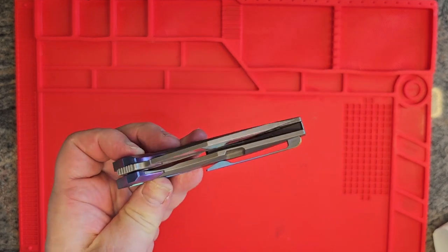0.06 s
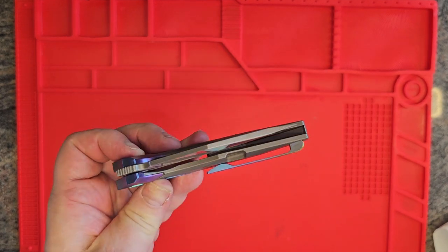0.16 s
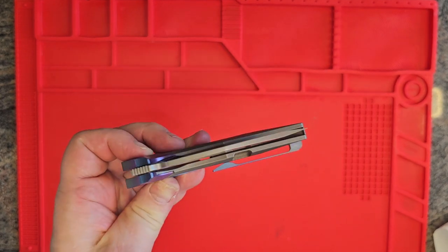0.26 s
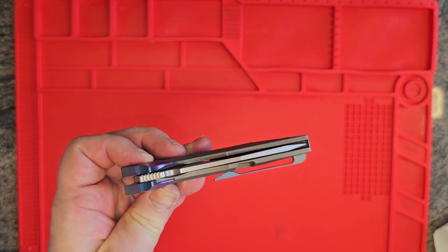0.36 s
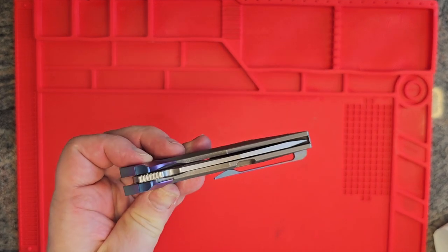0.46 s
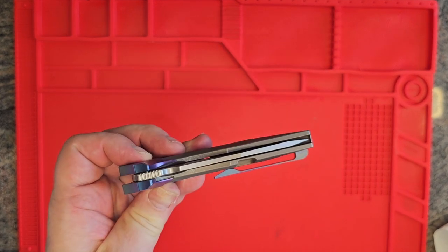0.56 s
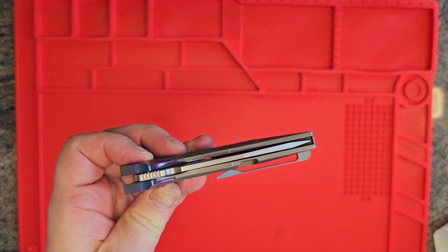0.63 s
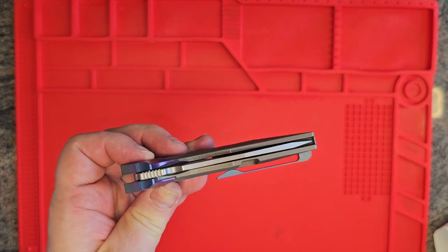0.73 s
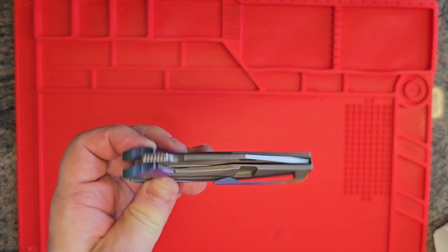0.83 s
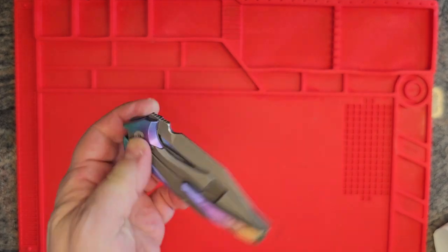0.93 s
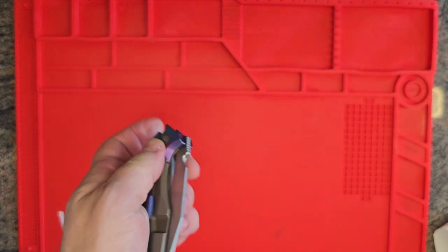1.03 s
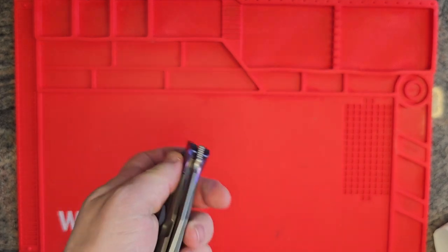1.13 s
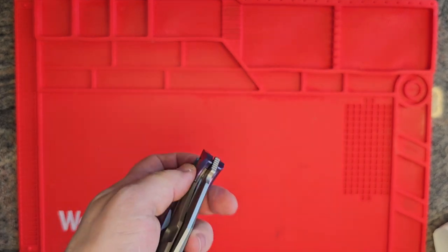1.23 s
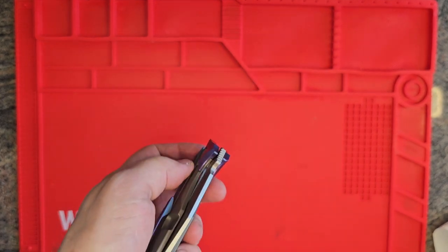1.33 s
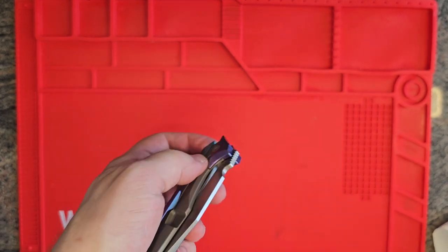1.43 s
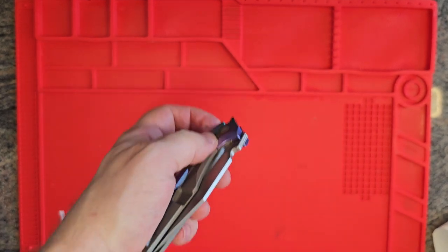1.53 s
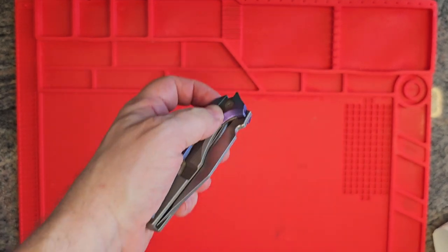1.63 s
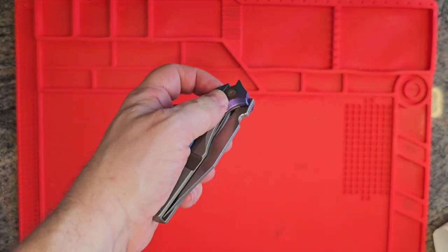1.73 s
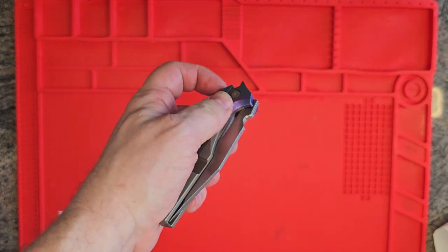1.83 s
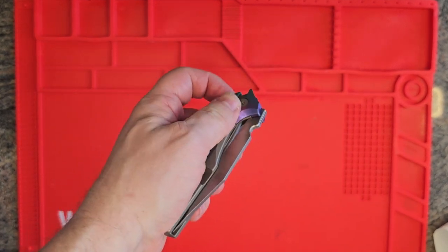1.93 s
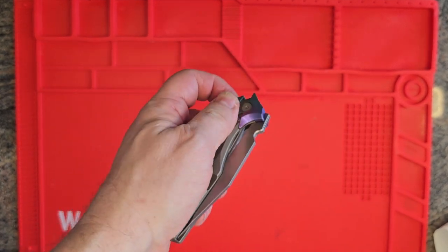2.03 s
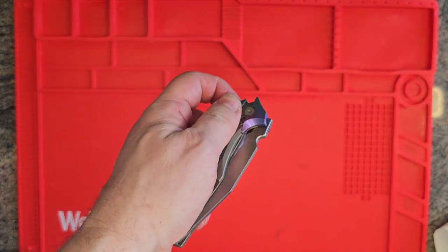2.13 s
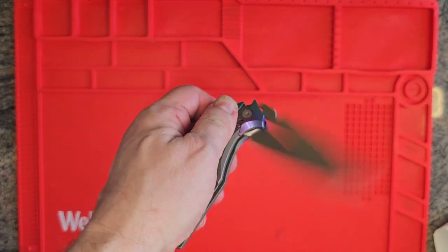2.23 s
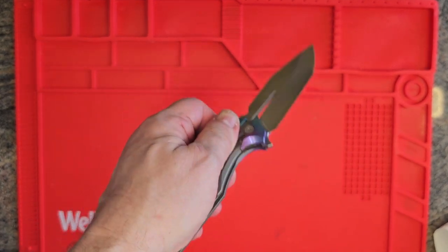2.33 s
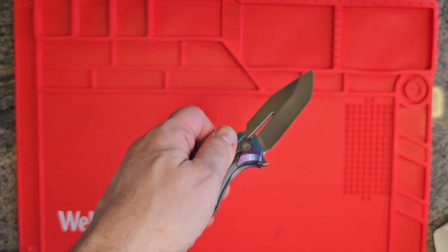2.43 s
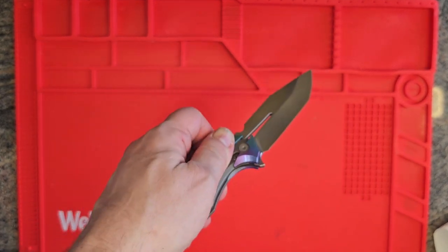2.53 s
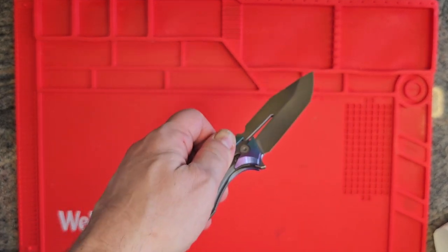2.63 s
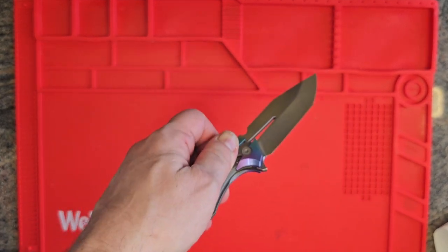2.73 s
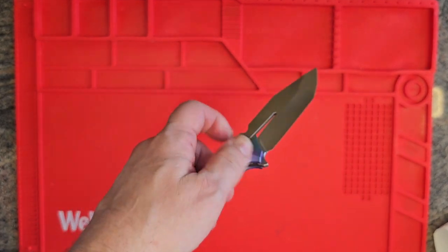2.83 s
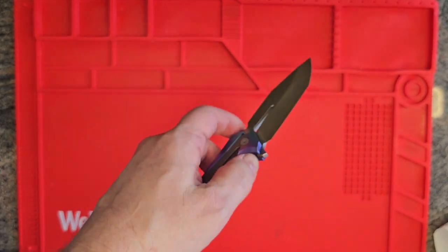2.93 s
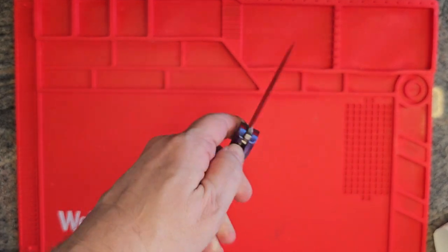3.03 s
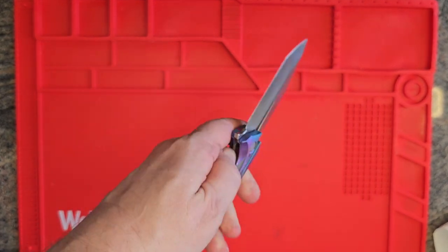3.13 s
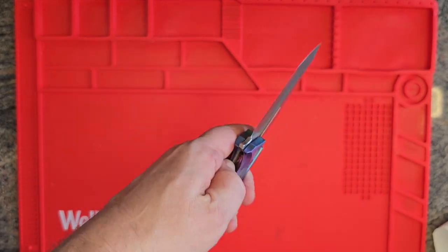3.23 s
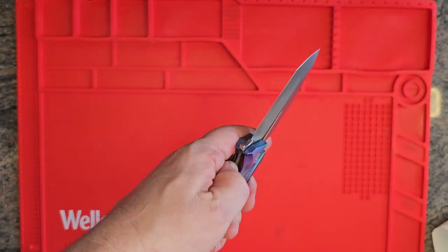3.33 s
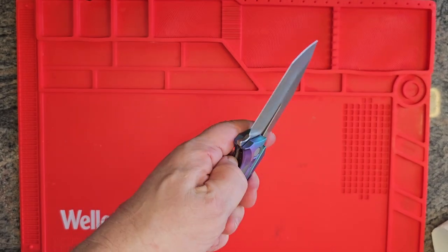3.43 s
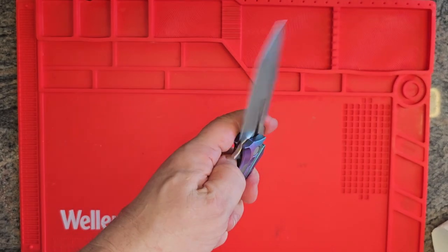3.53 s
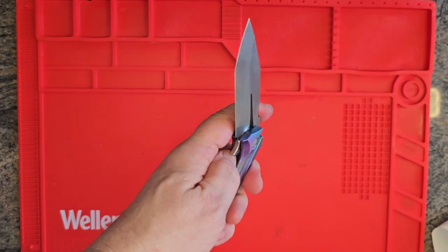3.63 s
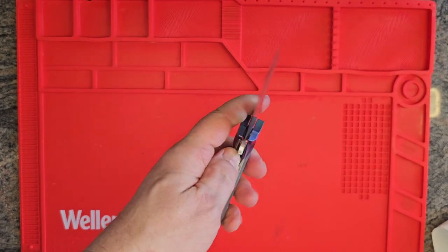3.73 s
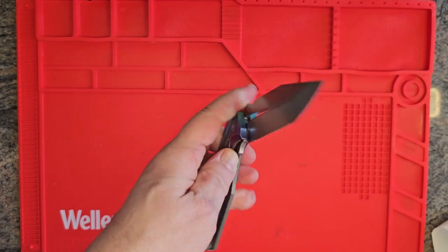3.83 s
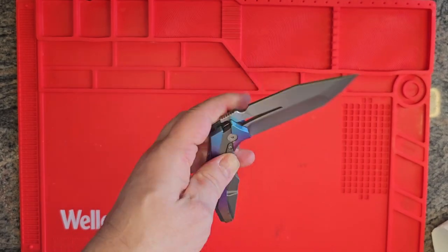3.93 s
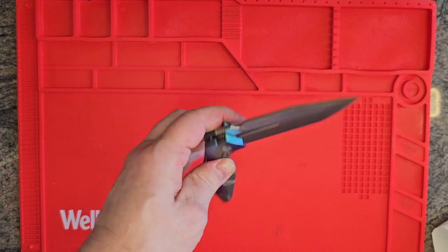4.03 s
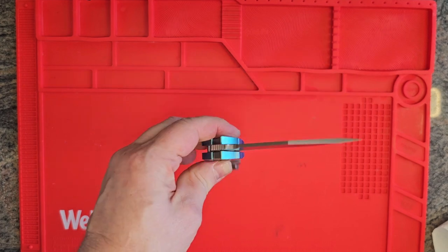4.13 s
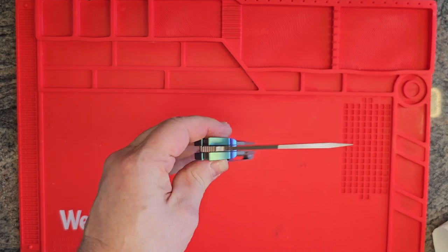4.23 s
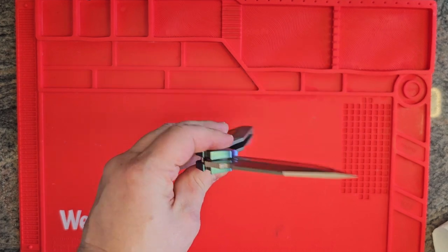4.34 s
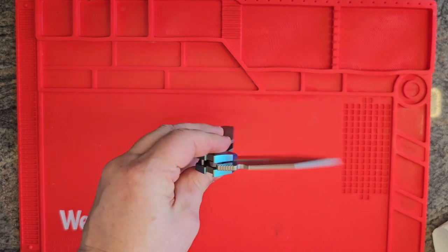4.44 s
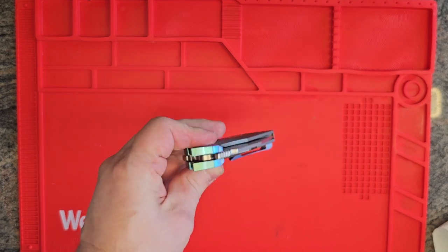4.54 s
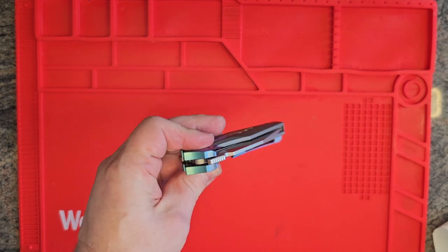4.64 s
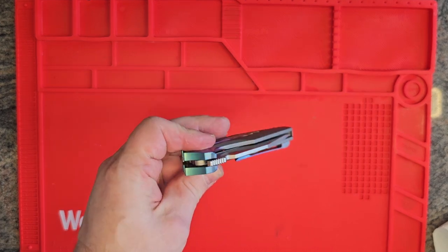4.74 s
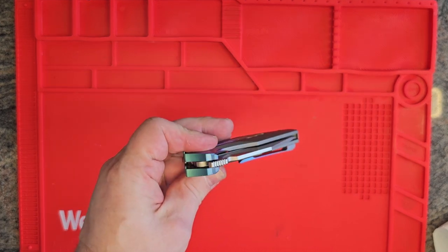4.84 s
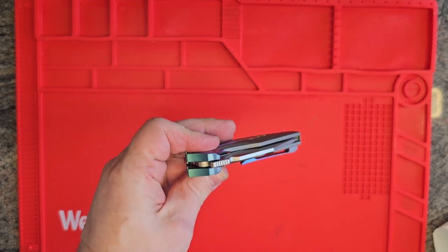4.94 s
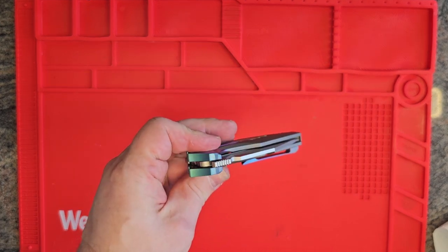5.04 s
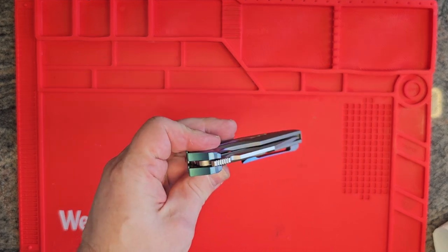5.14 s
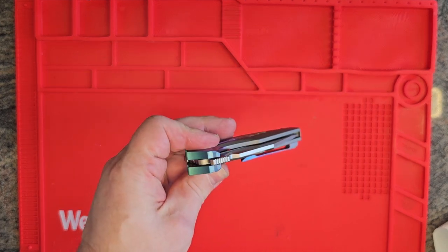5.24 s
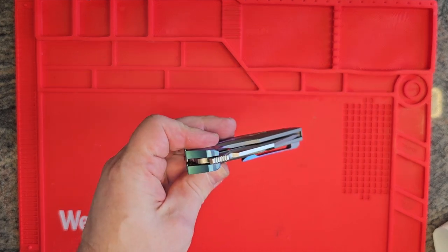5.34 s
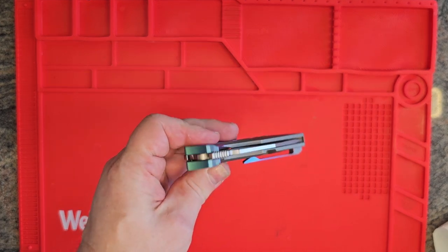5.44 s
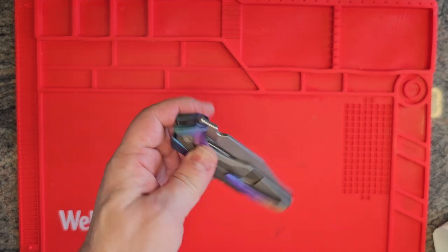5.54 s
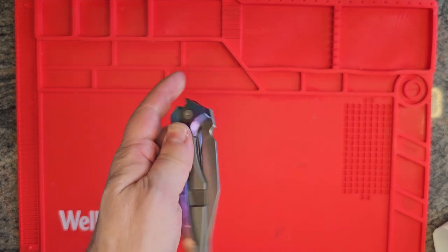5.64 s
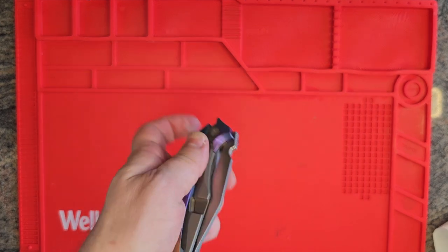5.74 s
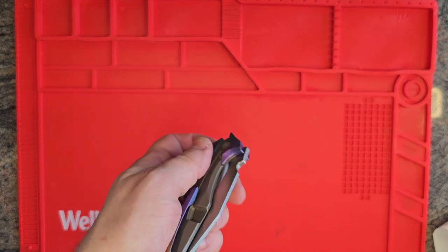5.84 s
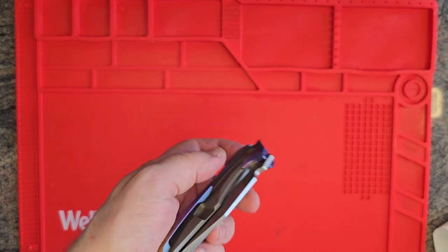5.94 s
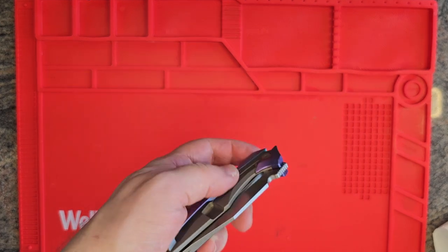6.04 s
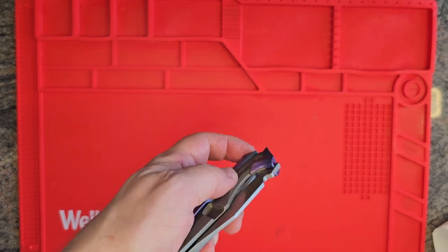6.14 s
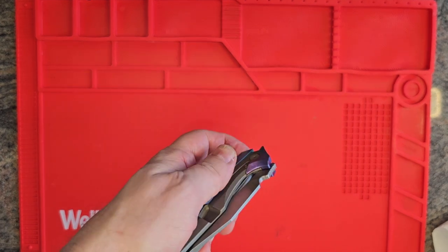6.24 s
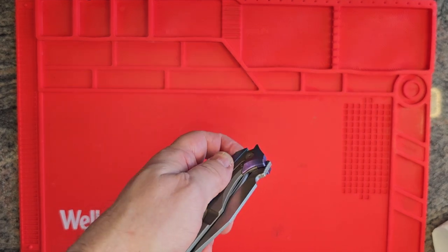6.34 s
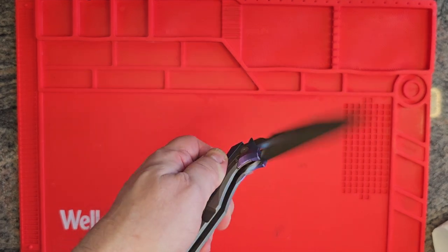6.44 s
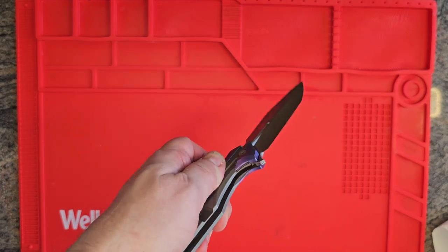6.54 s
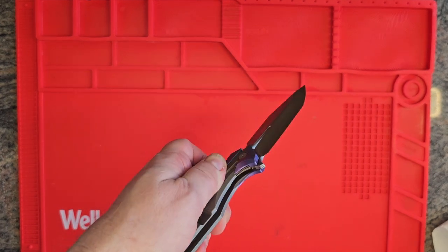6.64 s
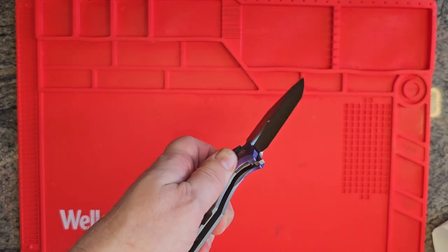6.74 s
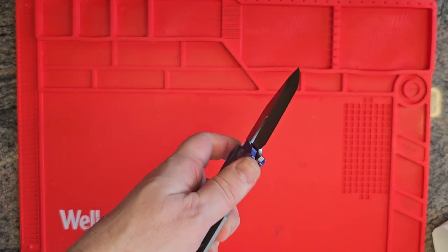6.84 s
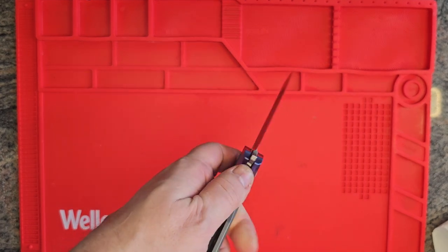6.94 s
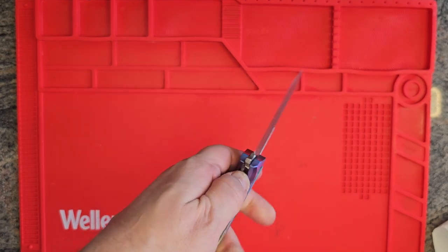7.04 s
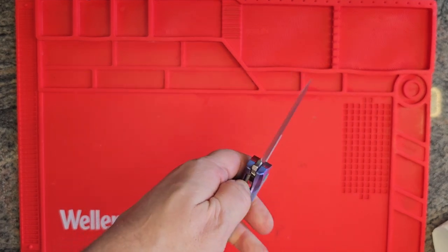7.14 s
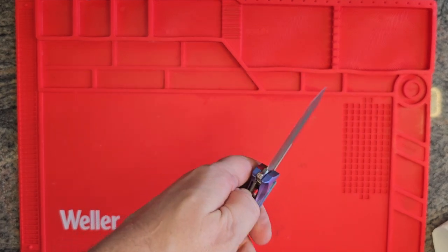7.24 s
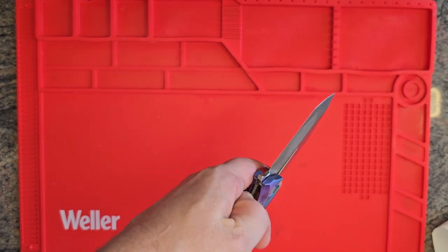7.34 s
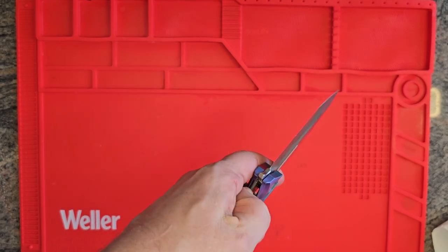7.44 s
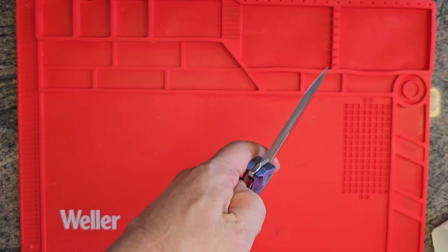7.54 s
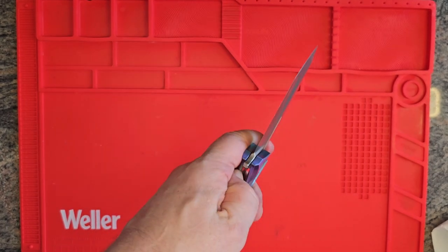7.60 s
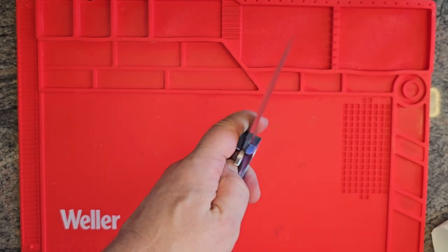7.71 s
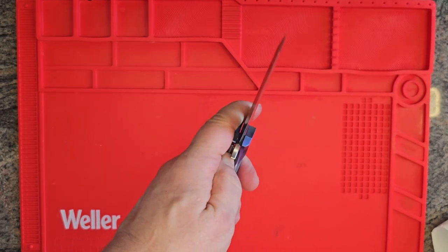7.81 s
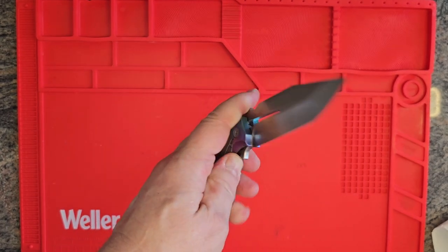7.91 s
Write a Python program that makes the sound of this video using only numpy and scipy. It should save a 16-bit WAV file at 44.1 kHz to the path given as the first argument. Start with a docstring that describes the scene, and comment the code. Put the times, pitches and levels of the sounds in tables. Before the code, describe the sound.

In a bare indoor room with very faint low ventilation, a folding knife claps shut close to the stereo microphone. After quiet handling, it flicks open with a hard, bright double snap. Tiny creaks follow, a lighter lock click, then the blade drops shut with a rattling clack. Another flick snaps it open, and faint creaks and ticks end it.

```python
"""First a faint brush of fingers over distant ventilation, then a folding knife clacks shut, close by.
It is flicked open, unlocked and dropped shut, then flicked open and unlocked again.
Each metal contact is a short noise rattle through the modes of the steel, answered by a bare room.
Small parts tick and the frame creaks; swells of filtered noise are the finger brushes, soft hiss and
faint whistles; low decaying sines thump under the flicks, and shaped noise is the ventilation."""
import sys
import numpy as np
from scipy import signal
from scipy.fft import rfft, irfft, next_fast_len
from scipy.io import wavfile
from scipy.ndimage import uniform_filter1d, map_coordinates

SR = 44100
rng = np.random.default_rng(int(sys.argv[2]) if len(sys.argv) > 2 else 0)


def file_out(sig):
    """Save sig as 16-bit WAV at sys.argv[1]."""
    # one column per channel
    cols = np.atleast_2d(sig).T
    # limit, then scale
    lim = np.clip(cols, -1, 1)
    pcm = np.round(lim * 32767).astype(np.int16)
    wavfile.write(sys.argv[1], SR, pcm)


N = 351477  # length in samples

# All contact tables: start_s, level_db (energy of the direct sound), left_minus_right_db, favoured_pitch_hz
# All mode tables: pitch_hz, width_hz (before the skirts are steepened), level_db (before tilt and favour)

# The blade drops into the handle and bounces: start_s, level_db, left_minus_right_db, favoured_pitch_hz
SHUT_HITS = [(0.2939, 8.5, 1.5, 3280), (0.2968, 2, 0, 3306), (4.4852, 7.5, -1.5, 3370),
             (4.4884, -3, 0, 3142), (4.4944, 1, 3.5, 3300), (4.5004, 1, 3.5, 3275)]
# Ringing of the folded knife: pitch_hz, width_hz, level_db
FOLDED_MODES = [(436.7, 700, -25.5), (1020, 1100, -34), (1780, 2000, -24.5), (2594, 500, -14.5),
                (3259, 450, -2), (3550, 550, -5), (3920, 610, -10.5), (4760, 810, -10.5),
                (5230, 570, -17.5), (6500, 1000, -14), (8010, 1200, -11), (9300, 1200, -18),
                (10580, 450, -12.5), (11523, 1400, -16), (12600, 1600, -20.5), (14300, 690, -13)]


def shutting():
    """The blade strikes the handle and bounces; the folded knife rings very briefly."""
    return contacts(SHUT_HITS, FOLDED_MODES, t60=.006, tilt_db=0, favour_db=3, scatter_db=1.2,
                    lead_s=.00002, room_db=0)


# The blade meets the stop pin and rebounds: start_s, level_db, left_minus_right_db, favoured_pitch_hz
STOP_HITS = [(2.2325, 12, -0.4, 5500), (2.2365, 8.5, 0.15, 5530), (6.4181, 12, -0.61, 4080),
             (6.4264, 2, -0.9, 3700), (6.4315, -1.5, .1, 7500)]
# The lock bar rides up the tang: start_s, level_db, left_minus_right_db, favoured_pitch_hz
LOCK_HITS = [(2.2214, 3.5, 0.1, 14970), (6.4037, 4, 0.4, 15060)]
# The blade jumps off its detent: start_s, level_db, left_minus_right_db, favoured_pitch_hz
DETENT_HITS = [(2.1654, -26.5, 0.4, 2240), (2.17, -25, -0.37, 2240), (2.1804, -22, 0.1, 2250),
               (6.351, -16.5, -0.4, 2250), (6.3554, -20.5, -0.45, 2260)]
# Ringing of the unfolded knife: pitch_hz, width_hz, level_db
UNFOLDED_MODES = [(599, 1400, -27), (1440, 800, -19), (2130, 650, -8), (2282, 61, -5.5), (3080, 500, -13),
                  (3663, 220, -4), (3805, 400, -1), (4516, 1600, -6), (5545, 270, -2), (6240, 700, -8.5),
                  (7470, 1600, -4.5), (9400, 1900, -12.5), (10800, 1100, -12.5), (12100, 1500, -18),
                  (12950, 1100, -18.5), (15000, 1500, -17.5)]


def opening():
    """Detent, lock bar and stop pin strike the same unfolded steel, each with its own hardness."""
    lock = contacts(LOCK_HITS, UNFOLDED_MODES, t60=.025, tilt_db=.15, favour_db=9, scatter_db=1.1,
                    lead_s=.00009, room_db=-1.5)
    stop = contacts(STOP_HITS, UNFOLDED_MODES, t60=.014, tilt_db=0, favour_db=2.5, scatter_db=1.7,
                    lead_s=.00009, room_db=.3)
    # the detent is a soft, dull contact: its tilt falls steeply
    detent = contacts(DETENT_HITS, UNFOLDED_MODES, t60=.011, tilt_db=-6.5, favour_db=3, scatter_db=1.2,
                      lead_s=.00009, room_db=.67)
    return lock + stop + detent


# The thumb pushes the lock bar aside: start_s, level_db, left_minus_right_db, favoured_pitch_hz
UNLOCK_HITS = [(3.476, -12, -0.5, 4190), (7.6686, -24, -7, 5570), (7.689, -33.5, 9, 5640)]
# Ringing at the lock bar: pitch_hz, width_hz, level_db
LOCK_BAR_MODES = [(1360, 260, -20.5), (2020, 650, -14), (2550, 410, -5), (3400, 1300, -13), (4100, 940, -5),
                  (5220, 480, -4.5), (5670, 410, 1.5), (6070, 470, -8), (7850, 900, -13), (8950, 1700, -22),
                  (10000, 1200, -17), (11400, 1800, -22), (13500, 900, -25), (15000, 1400, -29)]


def unlocking():
    """The pushed lock bar rings with its own modes."""
    return contacts(UNLOCK_HITS, LOCK_BAR_MODES, t60=.02, tilt_db=-.1, favour_db=3.5, scatter_db=2.4,
                    lead_s=.00008, room_db=-.3)


# Small parts tick as the grip changes: start_s, level_db, left_minus_right_db, favoured_pitch_hz
TICK_HITS = [(0.9783, -32, 6, 4260), (2.7314, -39, 2, 5160), (5.6385, -35, -4, 4880),
             (5.665, -43, -5, 7300), (7.4609, -36, 7.5, 5350), (7.595, -47, -3, 2280)]
# Ringing of the ticking parts: pitch_hz, width_hz, level_db
LOOSE_MODES = [(1500, 700, -11.5), (2370, 560, -5.5), (3300, 1200, -10), (4260, 720, -7), (5240, 750, -2),
               (6500, 800, -7), (7500, 1000, -10.5), (9600, 1500, -13.5), (11600, 1500, -13.5),
               (14000, 2900, -20)]


def ticks():
    """Faint contacts of small parts, each strongly favouring one pitch."""
    return contacts(TICK_HITS, LOOSE_MODES, t60=.0087, tilt_db=0, favour_db=11, scatter_db=1.3,
                    lead_s=.00008, room_db=.5)


# The thumb shifts the frame in small slips: start_s, level_db, left_minus_right_db, favoured_pitch_hz
CREAK_SLIPS = [(1.0208, -47, 4, 2540), (3.0507, -42, -2, 4070), (3.1033, -39.5, 0, 2690),
               (3.1138, -43, -7, 2680), (3.1286, -34, -2, 2690), (3.1582, -33.5, -15, 2670),
               (7.0693, -38.5, -4, 5327), (7.088, -36, -6, 5220), (7.12, -40.5, -5, 2600),
               (7.1558, -29.5, -2, 2620), (7.1908, -35, -18, 3315), (7.1962, -30, -6, 3280),
               (7.221, -37, -4.5, 2283)]
# Ringing of the frame: pitch_hz, width_hz, level_db
FRAME_MODES = [(1280, 950, -11.5), (2120, 540, 0.5), (2690, 210, -1), (3250, 490, -4.5), (4200, 350, 3),
               (5150, 410, -0.5), (6620, 350, -12), (8500, 2000, -27), (11200, 890, -26),
               (14000, 3500, -32)]


def creaks():
    """Small slips drive the modes of the frame one after another."""
    return contacts(CREAK_SLIPS, FRAME_MODES, t60=.013, tilt_db=1.3, favour_db=9.5, scatter_db=2.2,
                    lead_s=.00008, room_db=-.5)


# Likeness of a contact at the two sides: pitch_hz, common_share (0 to 1, of power)
CONTACT_SHARE = [(800, .98), (2000, .93), (4000, .8), (6500, .45), (12000, .3)]


def contacts(events, modes, t60, tilt_db, favour_db, scatter_db, lead_s, room_db):
    """Each contact is a dying noise rattle through the modes, a little different at each side.

    t60 in s is the rattle's 60 dB decay, tilt_db is per octave about 4 kHz, lead_s is the left's lead."""
    size = 8192
    half = size // 2
    out = np.zeros((2, N + SR))
    t, f = np.arange(size) / SR, np.fft.rfftfreq(size, 1 / SR)
    share = along(CONTACT_SHARE, f)
    lead = np.exp(-2j * np.pi * f * np.array([[0], [lead_s]]))  # the knife is nearer the left port
    hz, width, mode_db = np.transpose(modes)
    shapes = np.abs(resonance(f, hz[:, None], width[:, None])) ** 4  # steep skirts: dark valleys between modes
    rattle = amp(-60 * t / t60) * (1 - np.exp(-t / .00035))  # soft 0.35 ms onset
    for s, db, pan_db, struck_hz in events:
        noise = rfft(rng.standard_normal((3, size)) * rattle)
        # level the spectrum so that the rattle drives all modes evenly
        noise = noise * causal(1 / np.sqrt(uniform_filter1d(np.abs(noise) ** 2, size=120)))
        # the point of contact favours modes near one pitch
        favour = favour_db * np.exp(-(np.log(hz / struck_hz) / .1) ** 2)
        chance_db = scatter_db * rng.standard_normal((2, len(modes)))
        level_db = mode_db + tilt_db * np.log2(hz / 4000) + favour + chance_db
        body = causal(np.sqrt(amp(level_db) ** 2 @ shapes))
        common, own = noise[2] * lead * np.sqrt(share), noise[:2] * np.sqrt(1 - share)
        click = unit_energy(irfft(body * (common + own)))
        click = amp([[pan_db / 2], [-pan_db / 2]]) * click
        # the walls gather the sound sent in all directions: the plain modes
        ring = irfft(body)[:, :half]
        heard = amp(room_db) * room(unit_energy(ring), gap_s=.0049)
        heard[:, :half] += click[:, :half]
        out[:, round(s * SR):][:, :heard.shape[1]] += amp(db) * heard
    return out[:, :N]


# Likeness of diffuse sound at the two sides, for room and ventilation: pitch_hz, correlation (-1 to 1)
DIFFUSE_ALIKE = [(60, .66), (130, .72), (290, .66), (640, .43), (1400, -.1), (3000, 0)]
# Decay of the bare room: pitch_hz, t60_s
ROOM_DECAY = [(300, .42), (1000, .46), (2200, .53), (3600, .54), (5500, .48), (7700, .39), (11000, .31),
              (16000, .24)]
# Energy of the answer against the direct sound, before room_db and the fade-in: pitch_hz, level_db
ROOM_LEVEL = [(300, -6), (2000, -3), (6000, -4.5), (16000, 2)]


def room(x, gap_s):
    """A fresh diffuse noise tail for each side; each frequency dies at its own speed."""
    size = 2 * SR // 3
    hz, t, z = signal.stft(rng.standard_normal((2, size)), SR, nperseg=256)
    turn = np.arccos(along(DIFFUSE_ALIKE, hz))[:, None] / 2  # long waves reach both ports alike
    mid, side = np.cos(turn) * z[0], np.sin(turn) * z[1]
    z = np.array([mid + side, mid - side])
    t60 = along(ROOM_DECAY, hz)[:, None]
    even_energy = np.sqrt(6 * np.log(10) / (t60 * SR))  # long and short decays carry equal energy
    z = z * amp(along(ROOM_LEVEL, hz)[:, None] - 60 * t / t60) * even_energy
    tail = signal.istft(z, SR, nperseg=256)[1][:, :size]
    tail = tail * np.clip(np.arange(size) / SR / gap_s, 0, 1) ** 2  # the answer swells in over gap_s
    return signal.fftconvolve(x, tail, axes=1)


# Short low thumps under the flicks: start_s, level_db (right side, before the fade), pitch_hz
LOW_THUMPS = [(2.23, -50, 78), (2.237, -49.5, 32), (6.352, -45, 170), (6.419, -39, 181), (6.422, -54.5, 40)]


def low_thumps():
    """Low sines that fade by 8 dB per cycle, 3 dB weaker on the left."""
    out, t = np.zeros((2, N + SR)), np.arange(SR // 4) / SR
    side_db = np.array([[-3], [0]])
    for s, db, hz in LOW_THUMPS:
        thump = amp(db + side_db - 8 * hz * t) * np.sin(2 * np.pi * hz * t)
        out[:, round(s * SR):][:, :len(t)] += thump
    return out[:, :N]


# Skin drags over the handle: center_s, level_db, length_s
SKIN_DRAGS = [(0.246, -75, 0.037), (0.922, -79, 0.048), (0.982, -65.5, 0.023), (1.05, -82, 0.2),
              (1.65, -82, .025), (1.883, -84, 0.048), (2.755, -79, .06), (3.15, -79.5, .11),
              (5.02, -84, 0.037), (5.672, -71, .06), (5.92, -82, 0.099), (6.295, -77, .02),
              (6.93, -81, 0.13), (7.199, -86, 0.088), (7.69, -76, 0.075)]
# Soft hiss swelling up just before each flick's loud hits: center_s, level_db
HISS_SWELLS = [(2.197, -62.5), (6.368, -64)]
# Colour of the hiss: pitch_hz, level_db (per Hz, relative)
HISS_COLOUR = [(2500, -17.5), (5000, -4), (8500, 0.5), (12000, -2.5), (16000, -6)]


def brushes_and_hiss():
    """Each skin drag or hiss before a flick is a swell of faint noise with a fast random grain."""
    t = np.arange(N) / SR
    hiss_length_s = .08
    rubs = SKIN_DRAGS + [(s, db, hiss_length_s) for s, db in HISS_SWELLS]
    swells = sum(amp(db) * np.exp(-(2 * (t - s) / length) ** 2) for s, db, length in rubs)
    grain = map_coordinates(rng.standard_normal(N // 100), [np.arange(N) / 110])  # a new value every 110 samples
    hiss = pair(lambda hz: amp(along(HISS_COLOUR, hz)), [(1000, .3), (16000, .1)])
    return swells * unit(amp(2.6 * grain) * hiss)


# Faint narrow whistles: center_s, level_db, pitch_hz, length_s
FAINT_WHISTLES = [(0.92, -81, 5200, .04), (1.03, -73, 2520, 0.032), (2.76, -70.5, 5330, 0.045),
                  (4.42, -80.5, 3940, .08), (5.687, -73.5, 6620, 0.054), (6.167, -77.5, 3940, 0.087),
                  (6.917, -76.5, 2434, 0.12), (6.945, -76, 5250, 0.066), (7.411, -70.5, 1997, 0.035)]


def faint_whistles():
    """Short swells of noise around one pitch each, through one narrow resonance."""
    out, size = np.zeros((2, N + SR)), SR // 4
    for s, db, hz, length in FAINT_WHISTLES:
        band = unit(filtered(rng.standard_normal((2, size)), lambda f: resonance(f, hz, 160) ** 2))
        swell = np.exp(-(2 * (np.arange(size) - size // 2) / SR / length) ** 2)
        out[:, round(s * SR) - size // 2:][:, :size] += amp(db) * swell * band
    return out[:, :N]


# Colour of the air rush: pitch_hz, level_db (per Hz, relative)
RUSH_COLOUR = [(12, -42.5), (20, -14.5), (65, -19), (81, -11), (142, -9), (168, -10), (241, -3),
               (277, -9.5), (434, -17.5), (873, -27), (949, -34.5), (1330, -32), (2390, -39.5),
               (3840, -40.5), (16000, -66)]
# Narrow bands of the hum: pitch_hz, width_hz (before steepening), level_db (against the rush)
DUCT_TONES = [(95, 12, 1.5), (148, 32, 5.5), (185, 28, 2.5), (247, 22, 2), (320, 36, 5), (440, 30, 2),
              (1300.4, 180, 1.5), (3800, 550, -0.5)]


def ventilation():
    """Broad rush of air with a few fuzzy duct tones, all shaped from one stereo noise."""
    def colour(f):
        tones = sum(amp(2 * db) * np.abs(resonance(f, hz, width)) ** 4 for hz, width, db in DUCT_TONES)
        return amp(along(RUSH_COLOUR, f)) * np.sqrt(1 + tones)
    side_db = np.array([[.4], [-.4]])
    return amp(-61 + side_db) * pair(colour, DIFFUSE_ALIKE)


def amp(db):
    """Decibels to gain."""
    return 10 ** (np.asarray(db) / 20)


def unit(x):
    """x at rms 1."""
    return x / np.sqrt(np.mean(x ** 2) + 1e-20)


def unit_energy(x):
    """Each side of x at energy 1."""
    return x / np.linalg.norm(x, axis=1)[:, None]


def along(points, hz):
    """Value at hz between (Hz, value) points on a log frequency axis."""
    f, v = np.transpose(points)
    return np.interp(np.log(hz + 1), np.log(f + 1), v)


def filtered(x, response, pad=8192):
    """x times a complex response of frequency."""
    n = x.shape[-1]
    m = next_fast_len(n + pad, True)
    return irfft(rfft(x, m) * response(np.fft.rfftfreq(m, 1 / SR)), m)[..., :n]


def resonance(f, hz, width):
    """One damped mode, gain 1 at its centre."""
    return 1j * f * width / (hz * hz - f * f + 1j * f * width)


def causal(gain):
    """The response with this gain that starts at once (minimum phase, by folding the cepstrum)."""
    c = irfft(np.log(gain + 1e-6))
    half = c.shape[-1] // 2
    c[..., 1:half] *= 2
    c[..., half + 1:] = 0
    return np.exp(rfft(c))


def pair(response, alike):
    """Stereo noise of rms 1, partly shared by both sides."""
    def mid_side(hz):
        turn = np.arccos(along(alike, hz)) / 2
        return response(hz) * [np.cos(turn), np.sin(turn)]
    mid, side = filtered(rng.standard_normal((2, N)), mid_side)
    return unit(np.array([mid + side, mid - side]))


def scene():
    """Knife contacts, low thumps, soft noises and room air."""
    knife = shutting() + opening() + unlocking() + ticks() + creaks()
    soft_noises = brushes_and_hiss() + faint_whistles()
    return knife + low_thumps() + soft_noises + ventilation()


def record(dry):
    """The converter clips at full scale; a steep low-pass removes what lies above 15760 Hz."""
    return filtered(np.clip(dry, -1, 1), lambda hz: 1 / (1 + (hz / 15760) ** 200))


dry = scene()
out = record(dry)
file_out(out)
```